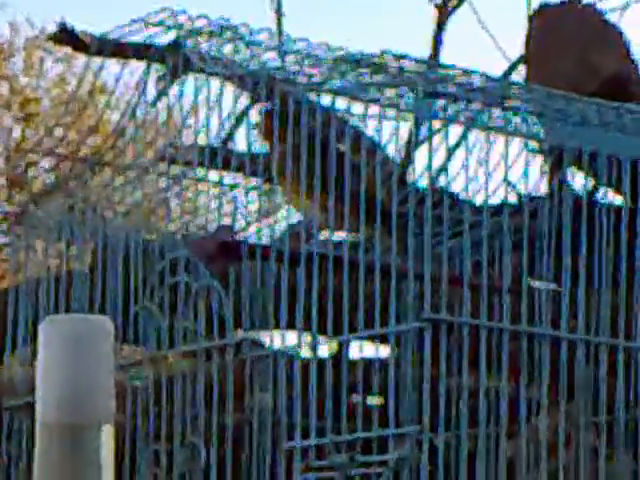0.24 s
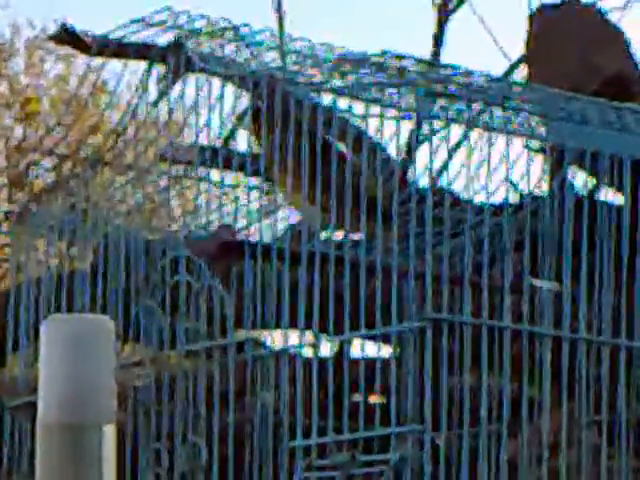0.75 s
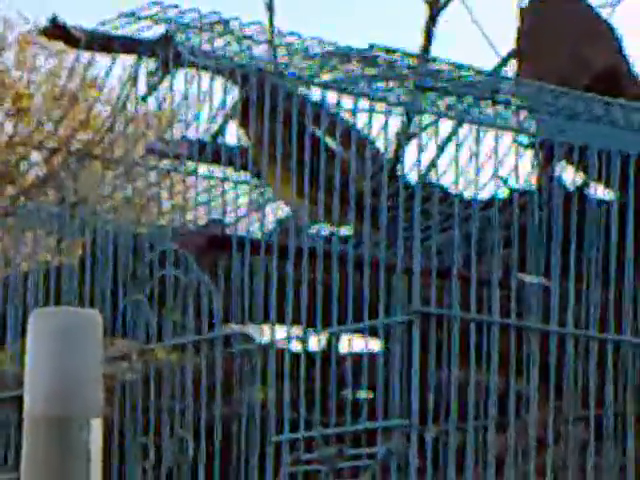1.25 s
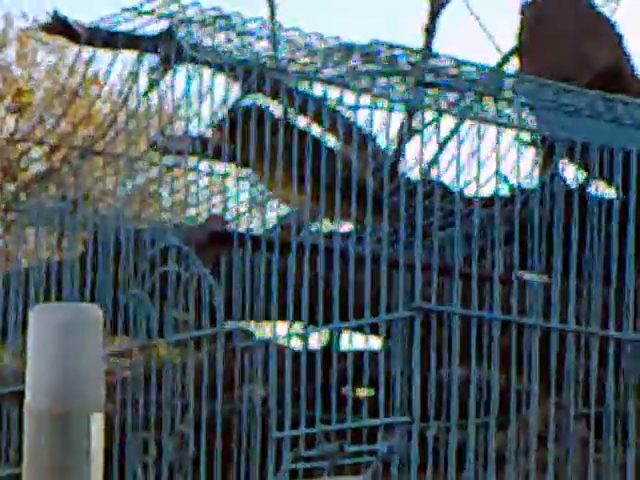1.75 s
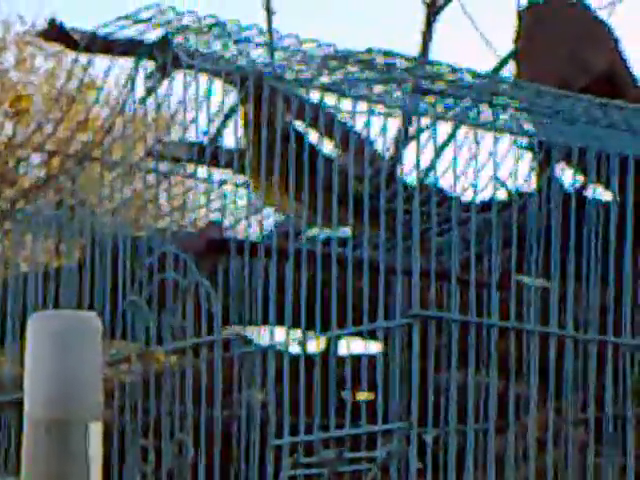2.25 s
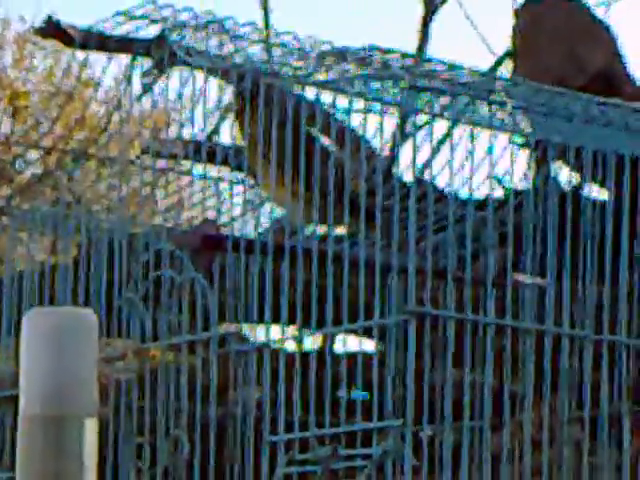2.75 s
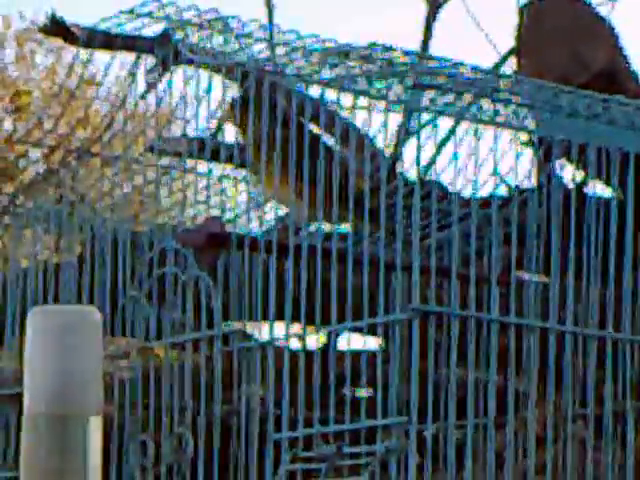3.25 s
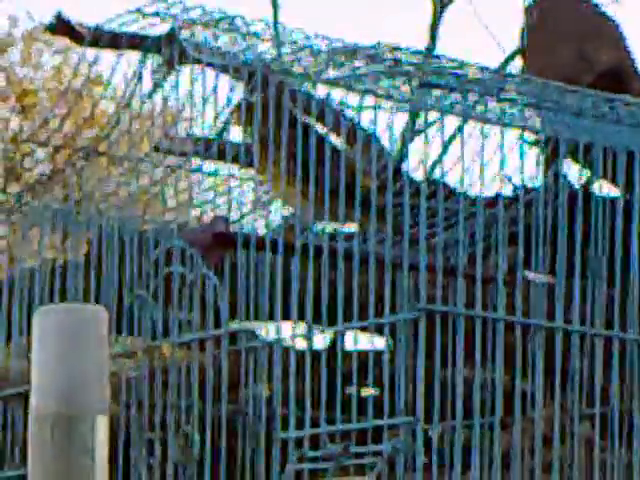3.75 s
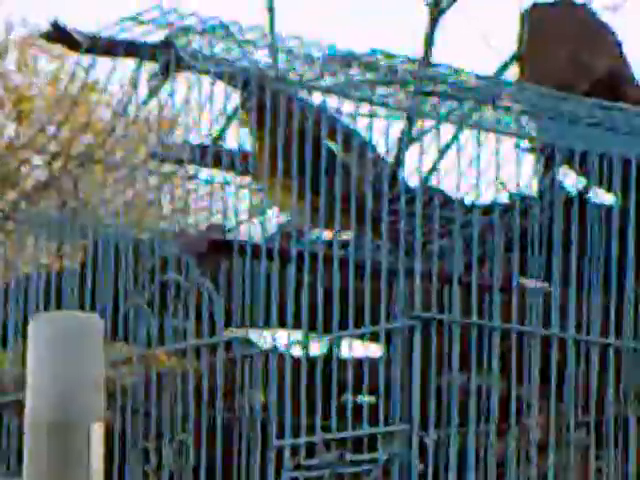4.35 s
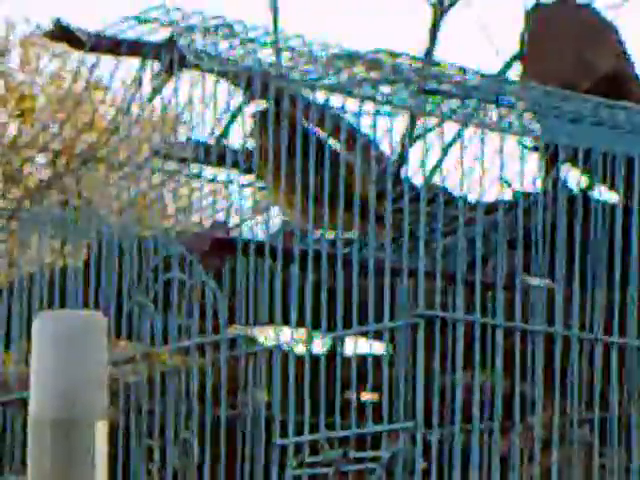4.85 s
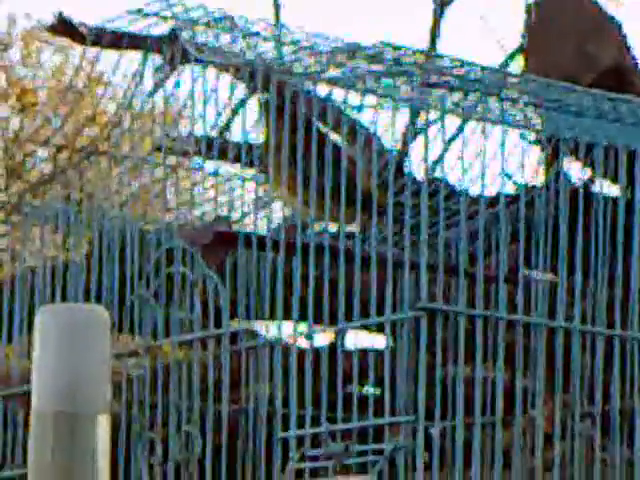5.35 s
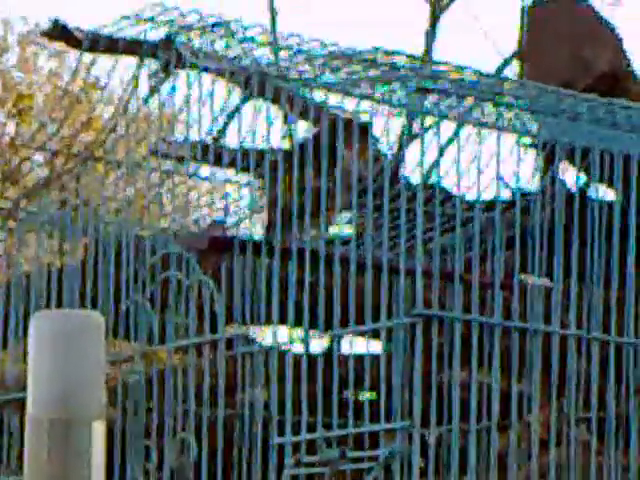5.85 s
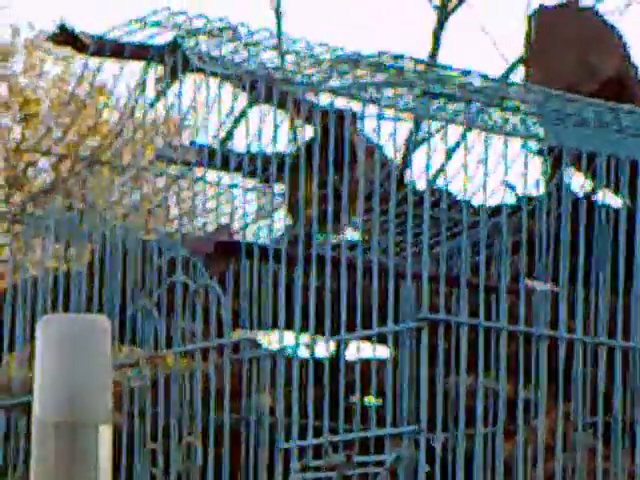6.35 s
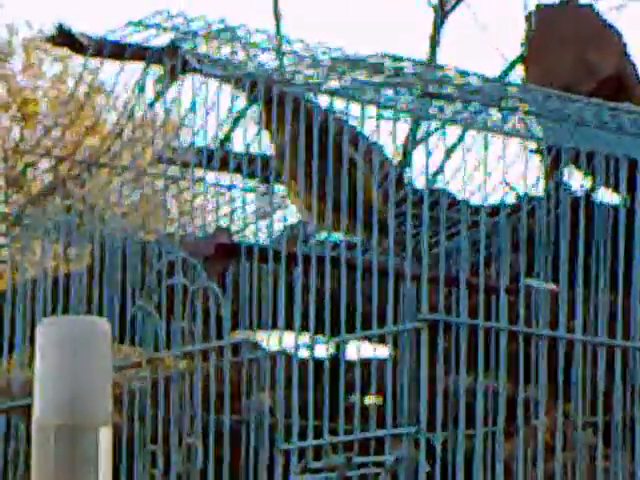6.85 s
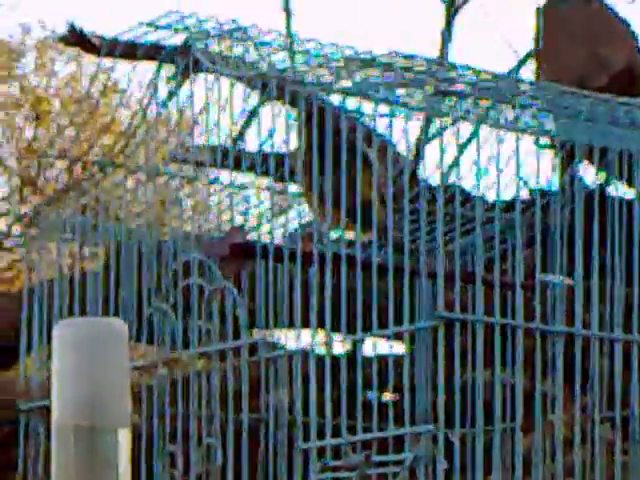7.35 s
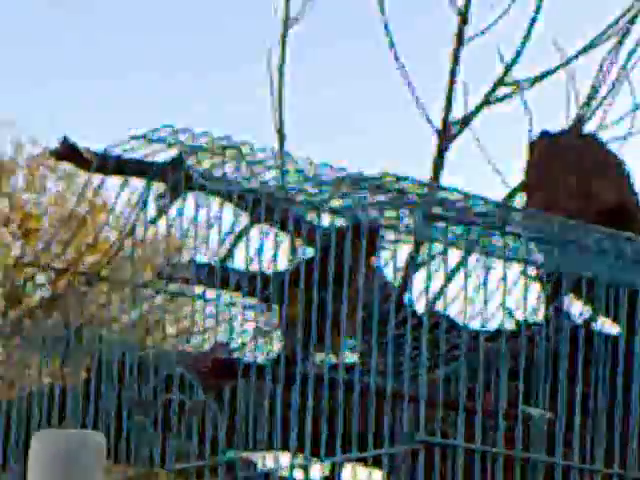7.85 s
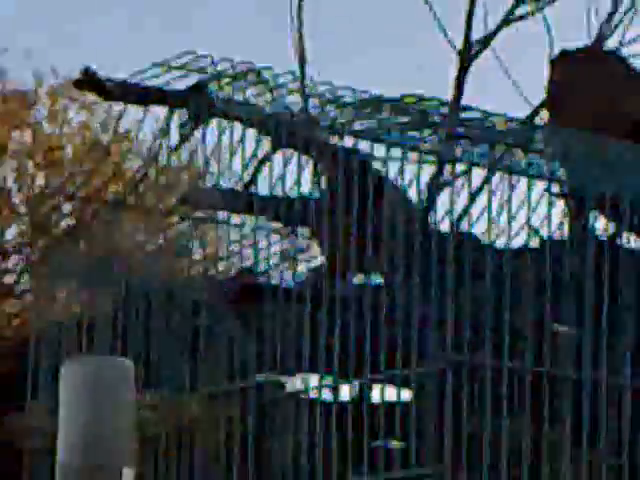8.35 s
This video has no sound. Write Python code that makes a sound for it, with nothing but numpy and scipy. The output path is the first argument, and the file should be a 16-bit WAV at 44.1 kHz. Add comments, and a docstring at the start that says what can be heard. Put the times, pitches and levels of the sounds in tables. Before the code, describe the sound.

Low gusty wind rumble and faint distant noise lie under a cage bird's clear, piercing song. Two short phrases come early with gaps where hoarse distant birds answer and light dry ticks are heard. Then the song thickens: a two-voiced upward note, lively chirps and twitters, a quick descending trill, and finally a string of rasping buzzes, with close short echoes from cage and wall.

```python
"""A caged canary hybrid sings outdoors, close to a hand-held microphone: slurred whistles, a two-voiced rising
note, chirps, twitters, a falling trill and a buzz. Each is a near-sine, shaped in pitch and level, roughened
by modulation. Cage and wall echo it; other birds sound further off, with a larger share of reflections.
Shaped noise makes the wind at the microphone, soft puffs, light ticks, a hiss on the notes,
and a far-off noise that swells and fades over still air."""
import sys
import numpy as np
from scipy import signal
from scipy.fft import rfft, irfft
from scipy.io import wavfile
from scipy.ndimage import uniform_filter1d

SR = 44100
rng = np.random.default_rng(int(sys.argv[2]) if len(sys.argv) > 2 else 0)


def store_pcm(level_fs):
    """Save levels as 16-bit WAV."""
    pcm = np.round(np.clip(level_fs, -1, 1) * 32767).astype(np.int16)
    wavfile.write(sys.argv[1], SR, np.atleast_2d(pcm).T)


N = 379701
TIME = np.arange(N) / SR


def whistle(start, hz, gain, second_db=-35):
    """Nearly sinusoidal oscillation: one side of the syrinx, with a faint octave and sidebands where it rasps."""
    phase = turn(hz)
    t = start + np.arange(len(hz)) / SR
    overtone = undb(second_db) * np.sin(2 * phase) * (hz < SR / 5)
    return fade(gain * (np.sin(phase) + overtone + rasp(phase, t)))


# Moments when the syrinx locks into a longer cycle.
# Each row: centre in seconds, half width in seconds, pitch cycles per long cycle, relative depth.
LONG_CYCLES = [(0.926, 0.015, 3.1, 0.49), (3.098, 0.01, 3.02, 0.56), (2.695, .03, 4.8, 0.36),
               (2.8, 0.025, 8.3, 0.15), (4.915, 0.022, 5, 0.35), (5.215, 0.039, 3.36, 0.39),
               (5.305, 0.005, 2.6, 0.69)]


def rasp(phase, t):
    """Subharmonic locking: a cycle several pitch periods long adds sidebands around the tone."""
    total = 0
    for centre, width, cycles, depth in LONG_CYCLES:
        if t[0] < centre < t[-1]:
            slow = phase / cycles
            sides = np.sin(phase + slow) + 0.26 * np.sin(phase - slow) + 0.24 * np.sin(phase + 2 * slow)
            locking = np.exp(-((t - centre) / width) ** 2)
            total = total + 0.56 * depth * locking * sides
    return total


def scratch(size, rough, flap_hz=680, jitter=0.17, grit=0.94):
    """Amplitude modulation: a membrane that flaps unevenly splits a whistle into parallel strands."""
    flap = np.cos(turn(np.full(size, float(flap_hz)), jitter))
    uneven = 1 + rough * (1.28 * flap + grit * walk(2200, size))
    return uneven / np.sqrt(1 + rough ** 2)


def turn(hz, waver=0.0078):
    """Phase as the integral of frequency: the pitch of the membrane wavers slightly."""
    return 2 * np.pi * np.cumsum(hz * (1 + waver * walk(500, len(hz)))) / SR


def fade(x, edge_s=0.00062):
    """Gradual onset and release: the airflow opens and shuts over a short linear ramp."""
    i = np.arange(len(x))
    return x * np.minimum(np.minimum(i, i[::-1]) / (edge_s * SR), 1)


# Level through a slide. Each row: time in fall times, level in dB relative to the slide.
SLIDE_SWELL = [(1.15, -0.5), (1.75, -0.5), (2.5, -10), (3.3, -26.5)]
# Slurred whistles. Each row: start in seconds, hold in seconds, fall time in seconds, bend of the fall (1-2),
# held pitch in Hz, final pitch in Hz, held note in dB, dip before the slide in dB, slide in dB.
SLURS = [(.835, .048, 0.045, 1.3, 5037, 3476, -21, -39.5, -21),
         (3.011, .044, .041, 1.45, 4990, 3522, -16.5, -33, -17.5),
         (6.445, 0.03, 0.026, 1.67, 6650, 4030, -54, -57, -17.5),
         (6.706, .023, 0.026, 1.85, 6560, 4010, -52, -60.5, -17.5)]


def slurs(edge_db=-26, held_peak=.44):
    """Stretched-exponential glide: a held note swells and dips, then swells again as pitch slides and settles."""
    out = np.zeros(N)
    for start, hold, fall, bend, high_hz, low_hz, held_db, dip_db, slide_db in SLURS:
        t = span(hold + fall * SLIDE_SWELL[-1][0])
        fallen = np.exp(-(np.maximum(t - hold, 0) / fall) ** bend)
        hz = low_hz + (high_hz - low_hz) * fallen
        held = [(0, held_db + edge_db), (held_peak * hold, held_db), (hold, dip_db)]
        slide = [(hold + fall * u, slide_db + swell_db) for u, swell_db in SLIDE_SWELL]
        db, = curve(held + slide, t)
        add(out, start, whistle(start, hz, undb(db)))
    return out


# The long rising note of the lower voice.
# Each row: time in seconds, pitch in Hz, fundamental in dB, second harmonic in dB.
LOWER_VOICE = [(5.008, 1581, -39, -30.5), (5.033, 1875, -31.5, -31.5), (5.045, 2120, -25.5, -5),
               (5.06, 2430, -28, -22.5), (5.068, 2633, -41, -10), (5.092, 2994, -33, -17),
               (5.12, 3120, -37, -24.5), (5.148, 3450, -30, -30.5), (5.2, 3644, -33, -27.5),
               (5.26, 3710, -46, -35.5), (5.3, 3634, -33.5, -63), (5.335, 3670, -39.5, -74)]
# Hoarseness of the rising note. Each row: time in seconds, roughness (0-1).
LOWER_ROUGHNESS = [(5.008, .3), (5.028, .2), (5.036, .03), (5.06, .04), (5.078, .15), (5.13, .25),
                   (5.2, .19), (5.26, .07), (5.335, .03)]


def lower_voice(third_db=-14, fourth_db=-32, throat_db=18):
    """Harmonic series of a hoarse, climbing note, mostly led by its second harmonic."""
    out, start = np.zeros(N), LOWER_VOICE[0][0]
    t = start + span(LOWER_VOICE[-1][0] - start)
    hz, first_db, second_db = curve(LOWER_VOICE, t)
    rough, = curve(LOWER_ROUGHNESS, t)
    phase = turn(hz, waver=0.0046)
    # while the pitch is low, the third harmonic lies in the throat resonance
    third = undb(third_db + np.interp(hz, [1700, 2400], [throat_db, 0]))
    odd = undb(first_db) * (np.sin(phase) + third * np.sin(3 * phase) + rasp(phase, t))
    even = undb(second_db) * (np.sin(2 * phase) + undb(fourth_db) * np.sin(4 * phase))
    hoarse = scratch(len(t), rough, flap_hz=918, jitter=0.33, grit=0.6)
    add(out, start, fade((odd + even) * hoarse))
    return out


# The upper voice of the two-voiced note. Each row: time in seconds, pitch in Hz, level in dB.
UPPER_VOICE = [(5.069, 5210, -14), (5.078, 5380, -29), (5.107, 6030, -18.5), (5.124, 5080, -26),
               (5.139, 5015, -18), (5.164, 5030, -31), (5.193, 4300, -27), (5.213, 4005, -15.5),
               (5.232, 3676, -26), (5.26, 3557, -21), (5.285, 3625, -32)]


def upper_voice():
    """Two independent oscillators: the other side whistles over the rising note and comes down to meet it."""
    out, start = np.zeros(N), UPPER_VOICE[0][0]
    hz, db = curve(UPPER_VOICE, start + span(UPPER_VOICE[-1][0] - start))
    add(out, start, whistle(start, hz, undb(db)))
    return out


# Short clear chirps. Each row: start in seconds, length in seconds, pitch at the start in Hz,
# at the middle in Hz, at the end in Hz, level in dB, place of the loudness peak (0-1).
CLEAR_CHIRPS = [(2.677, 0.047, 5530, 5217, 5450, -20, 0.26), (2.775, 0.044, 5500, 4860, 5420, -14.5, 0.37),
                (3.1553, 0.053, 3510, 3713, 3780, -29.5, 0.35), (4.901, 0.035, 5460, 5330, 4970, -24, .62),
                (5.4889, 0.019, 2630, 3830, 4780, -19.5, 0.57), (5.5598, .047, 2890, 4040, 4100, -16, 0.6),
                (5.6534, 0.07, 2500, 3213, 3620, -27, .54), (5.735, 0.031, 3280, 4910, 5020, -15, .26),
                (5.808, 0.048, 6130, 5974, 5930, -25.5, 0.63),
                (5.9082, 0.052, 5470, 5086, 5500, -16.5, 0.44),
                (5.9745, 0.055, 2620, 3285, 3560, -29.5, 0.47), (6.035, 0.042, 3100, 3993, 4030, -15, 0.7),
                (6.106, 0.034, 3640, 4850, 4470, -13.5, 0.31),
                (6.1454, .036, 5700, 5614, 5580, -19.5, 0.67), (6.28, .027, 3600, 4030, 4280, -18, 0.72),
                (6.4334, 0.032, 2760, 3766, 3500, -24.5, 0.3),
                (6.6823, 0.036, 2700, 3810, 3970, -22.5, 0.37)]


def clear_chirps(rough=0.041):
    """Frequency modulation of a clear tone: quick chirps with only slight roughness."""
    return chirps([(*row, rough) for row in CLEAR_CHIRPS])


def chirps(rows):
    """Parabolic frequency sweep: each chirp is one arc of pitch under one swell of air pressure."""
    out = np.zeros(N)
    for start, length, first_hz, middle_hz, last_hz, db, peak, rough in rows:
        u = span(length) / length
        arc = np.polyfit([0, .5, 1], [first_hz, middle_hz, last_hz], 2)
        hz = np.polyval(arc, u)
        progress = np.interp(u, [0, np.clip(peak, .05, .95), 1], [0, .5, 1])
        swell = np.sin(np.pi * progress) ** 2
        add(out, start, whistle(start, hz, undb(db) * swell * scratch(len(u), rough)))
    return out


# The four strokes of a twitter: rasping upstroke, low murmur, clear tone, rasping downstroke.
# Each row: start from the tone's start in seconds, length in seconds, pitch before the twitter's factor
# at the start in Hz, at the middle in Hz, at the end in Hz, place of the loudness peak (0-1), roughness.
TWITTER_STROKES = [(-.028, .017, 2840, 4150, 5600, 0.49, 1.2), (-.022, 0.0368, 2924, 3020, 3690, 0.64, 0.5),
                   (0, 0.0273, 4090, 4450, 4700, .35, 0.03), (.019, .026, 4700, 3960, 1970, 0.49, 0.6)]
# Each row: start of the clear tone in seconds, pitch factor, then upstroke, murmur, tone and downstroke in dB.
TWITTERS = [(.761, .96, -33.5, -42.5, -20, -34.5), (2.931, 1, -27, -37, -17, -27.5),
            (6.257, 1.08, -44, -40, -27.5, -48), (6.381, 1.05, -36.5, -43.5, -21, -30),
            (6.632, 1.005, -32.5, -44.5, -24, -30.5)]


def twitters():
    """Transposition of one motif: the same four strokes, a little higher or lower and differently stressed."""
    rows = []
    for start, pitch, *levels in TWITTERS:
        for stroke, db in zip(TWITTER_STROKES, levels):
            delay, length, first, middle, last, peak, rough = stroke
            rows.append((start + delay, length, first * pitch, middle * pitch, last * pitch, db, peak, rough))
    return chirps(rows)


# One falling syllable, before stretch and pitch factor.
# Each row: time from its start in seconds, pitch in Hz, relative level in dB.
FALLING_SYLLABLE = [(0.0, 8360, -39), (0.0044, 6660, -37), (0.0061, 5260, -16), (0.0093, 4960, -8),
                    (0.0139, 4550, -34), (0.0171, 4044, -14.5), (0.025, 3430, -22), (0.034, 3090, -26.5),
                    (0.043, 2677, -38.5)]
# The trill. Each row: start in seconds, stretch in time, pitch factor, relative level in dB.
TRILL = [(6.8929, 1.42, 0.96, -7), (6.968, 1.16, 0.95, -0.7), (7.0375, 1.05, 0.97, 1.5),
         (7.1085, 1.07, 0.98, 0.4), (7.1748, 1.03, 0.98, 1.5), (7.2423, 1.08, 0.95, -1.2),
         (7.3127, 1.04, 0.97, -1), (7.3836, 1.06, 0.97, -2.5)]


def trill():
    """Periodic repetition of one steep downward sweep, about fourteen times a second."""
    out = np.zeros(N)
    for start, stretch, pitch, db in TRILL:
        t = span(FALLING_SYLLABLE[-1][0] * stretch) / stretch
        hz, shape_db = curve(FALLING_SYLLABLE, t)
        add(out, start, whistle(start, hz * pitch, undb(db + shape_db)))
    return out


# One cycle of the buzz, a whip up and down. Each row: share of the cycle, pitch in Hz, relative level in dB.
WHIP = [(0, 2634, -32), (.12, 4370, 0.5), (.2, 5507, -7), (.32, 7210, -6), (.42, 7490, -10.5),
        (.52, 5210, -6.5), (.62, 3900, -10), (.75, 2897, -29.5), (1, 4496, -5)]
# Buzzy syllables. Each row: start in seconds, relative level in dB, length in seconds.
BUZZ = [(7.482, -19.5, 0.05), (7.5718, -16.5, 0.049), (7.662, -16, 0.055), (7.755, -16, 0.054),
        (7.8482, -13, 0.055), (7.946, -13.5, 0.052), (8.041, -13.5, 0.056)]
# Colour of the rasping air. Each row: frequency in Hz, relative level in dB.
BUZZ_AIR = [(1500, -29.5), (2600, -20), (3500, -22), (4700, 5.5), (5700, -13), (6300, -25), (7200, -14),
            (8600, -21), (10000, -22.5), (12500, -17.5), (16000, -34)]


def buzz(whip_s=.0135, rough=0.061, first_db=-10, flutter_db=2, air_db=-9, high_hz=8000):
    """Fast periodic frequency modulation: about four pitch whips a swelling syllable, each with rasping air."""
    out = np.zeros(N)
    for start, db, length in BUZZ:
        t = span(length)
        hz, shape_db = curve(WHIP, t / whip_s % 1)
        push_db = np.interp(t / length, [0, .55, 1], [first_db, 0, -1]) + flutter_db * walk(900, len(t))
        gain = undb(db + shape_db + push_db)
        tone = whistle(start, hz * (1 + rough * walk(1500, len(t))), gain)
        air = undb(air_db) * fade(gain * noise(BUZZ_AIR, len(t)))
        add(out, start, dull(tone, high_hz, order=4) + air)
    return out


# Echoes from cage, ledge and wall. Each row: delay in seconds, level in dB relative to the direct sound.
ECHOES = [(.002, -24), (.0044, -10), (.0069, -14), (.009, -35), (.0095, -17), (0.0114, -16)]


def yard(x, scatter_db=-12, scatter_t60=0.089, far_db=-24, far_t60=0.41):
    """Reflection: direct sound, close echoes, scatter from the cage and a faint, duller outdoor tail."""
    echoes = sum(undb(db) * np.roll(x, int(delay * SR)) for delay, db in ECHOES)
    scatter = tail(x, t60=scatter_t60, db=scatter_db)
    far = tail(dull(x, 4000, order=6), t60=far_t60, db=far_db)
    return x + echoes + scatter + far


def tail(x, t60, db, gap_s=0.002):
    """Exponential decay of scattered reflections, which fall 60 dB in t60 seconds."""
    t = span(.6)
    response = rng.standard_normal(len(t)) * undb(-60 * t / t60) * (t > gap_s)
    return undb(db) * signal.fftconvolve(x, response / np.linalg.norm(response))[:N]


# Colour of the hiss. Each row: frequency in Hz, relative level in dB.
HISS_COLOUR = [(1000, -16.5), (3000, 6), (5000, -2.5), (6500, -4.5), (9000, 0.5), (13000, 2), (16000, 1)]
# Hiss phrase by phrase. Each row: time in seconds, relative level in dB.
HISS_LEVEL = [(1, -0.5), (2.65, 7.5), (3.2, 2.5), (4.9, 8), (5.2, 2), (5.9, 0.5), (6.7, -1.5), (8.1, 0)]


def hiss(song, db=-34, law=0.37, quiet_db=-40):
    """Envelope following: a faint wide hiss rides on the notes, compressed in level, and sinks between them."""
    loudness = np.sqrt(np.abs(uniform_filter1d(song ** 2, size=500)))
    sounding = loudness ** 2 / (loudness ** 2 + undb(quiet_db) ** 2)
    loudest = loudness.max()
    compressed = loudest * (loudness / loudest) ** law
    phrase_db, = curve(HISS_LEVEL, TIME)
    return undb(db + phrase_db) * compressed * sounding * noise(HISS_COLOUR)


# Other birds. Each row: start in seconds, length in seconds, pitch at the start in Hz, at the end in Hz,
# relative level in dB, roughness (0-1).
FAR_CHIRPS = [(.152, .04, 3310, 5000, -41, 0.9), (0.175, 0.045, 4210, 2610, -35.5, 0.5),
              (0.5, 0.082, 4340, 3100, -52.5, .6), (1.114, 0.061, 3800, 4890, -44.5, 0.7),
              (1.146, 0.032, 4030, 2640, -40.5, 0.7), (1.336, .027, 3520, 4990, -42, 0.8),
              (1.359, 0.046, 4010, 2650, -38, .35), (1.435, 0.035, 4700, 3500, -54, 0.7),
              (1.545, 0.04, 4360, 4140, -53, 0.1), (1.729, 0.06, 5020, 3800, -51.5, 0.4),
              (2.073, 0.062, 4060, 2540, -50, 0.4), (3.26, 0.037, 5220, 4170, -48, 0.3),
              (3.322, .05, 4700, 2630, -40, 0.2), (3.351, 0.073, 3030, 2510, -43, .1),
              (3.395, 0.058, 5300, 2960, -47.5, 0.2), (3.645, 0.068, 3990, 3300, -52.5, 0.5),
              (4.413, 0.079, 4366, 4720, -41.5, 0.4), (4.738, 0.095, 4340, 3200, -54, .4),
              (4.939, 0.046, 4230, 2970, -37.5, 0.65)]


def other_birds(direct_db=-3, sag=0.96, peak=.33):
    """Low direct-to-reverberant ratio: slides from further off, some hoarse, with a large share of reflections."""
    rows = []
    for start, length, first, last, db, rough in FAR_CHIRPS:
        middle = sag * (first + last) / 2
        rows.append((start, length, first, middle, last, db, peak, rough))
    far = chirps(rows)
    return undb(direct_db) * far + tail(far, t60=0.22, db=-5.0)


# Light ticks. Each row: time in seconds, relative level in dB.
TICKS = [(1.226, -32), (1.306, -41), (1.918, -31), (2.249, -39), (2.71, -28.5), (3.517, -37), (3.931, -36),
         (4.068, -26), (4.117, -37), (4.195, -29.5), (4.353, -30), (4.405, -28.5), (4.434, -29),
         (6.992, -30), (7.14, -31), (8.162, -27.5), (8.41, -28.5)]
# What the ticks ring with. Each row: frequency in Hz, relative level in dB.
TICK_COLOUR = [(300, -3.5), (900, 4.5), (1800, 4.5), (2700, -9), (4300, 2), (7000, -11), (15000, -20)]


def ticks(t60=0.051, gain_db=-7):
    """Damped impact: small dry knocks on the cage, noise that decays exponentially."""
    out, t = np.zeros(N), span(0.087)
    for start, db in TICKS:
        add(out, start, noise(TICK_COLOUR, len(t)) * undb(db + gain_db - 60 * t / t60))
    return out


# Soft hollow puffs. Each row: start in seconds, length in seconds, centre in Hz, relative level in dB.
PUFFS = [(0.203, 0.21, 1250, -42.5), (0.198, 0.17, 780, -47), (0.682, 0.17, 1090, -40),
         (1.851, 0.32, 965, -49), (3.803, 0.2, 1070, -44), (4.003, 0.15, 1000, -43),
         (6.091, 0.13, 1055, -51)]
# Resonance of a puff. Each row: ratio to the centre frequency, relative level in dB.
PUFF_SHAPE = [(.5, -18), (.8, -2.5), (1, 7.5), (1.15, -12.5), (1.4, -8.5), (2, -44)]


def puffs():
    """Resonance-filtered noise: short distant bursts in one broad band, quick to rise and slower to die."""
    out = np.zeros(N)
    for start, length, hz, db in PUFFS:
        u = span(length) / length
        body = noise([(hz * ratio, shape_db) for ratio, shape_db in PUFF_SHAPE], len(u))
        add(out, start, body * undb(db) * np.sin(np.pi * u ** 0.64) ** 2)
    return out


# Colours of the low and upper wind. Each row: frequency in Hz, relative level in dB.
WIND_LOW = [(15, 0), (30, 7), (60, 10.5), (85, 10.5), (115, 4.5), (160, -6), (250, -62)]
WIND_HIGH = [(70, -34.5), (125, 2), (170, -1.5), (240, -11), (330, -21.5), (480, -34.5), (900, -75)]
# Strength of the breeze at the microphone. Each row: time in seconds, relative level in dB.
BREEZE = [(0, -40), (.12, -27.5), (.85, -31.5), (1.84, -35.5), (1.97, -46), (2.72, -48.5), (2.9, -36),
          (3.25, -42.5), (3.6, -32), (4.28, -35.5), (4.85, -30), (5.08, -49), (5.38, -31), (6.2, -37),
          (6.55, -21.5), (7.0, -39.5), (7.85, -28), (8.15, -41.5), (8.35, -29.5), (8.61, -35)]
# Gusts. Each row: centre in seconds, length in seconds, rumble and upper part as relative levels in dB.
GUSTS = [(0.127, 0.19, -22, -37.5), (0.286, 0.14, -21.5, -24.5), (0.538, 0.059, -27, -46),
         (0.632, 0.098, -19, -32.5), (0.742, 0.092, -24, -35), (1.071, 0.22, -26, -28.5),
         (1.181, 0.076, -28, -27), (1.55, 0.19, -25, -35), (2.137, .05, -31.5, -49),
         (2.46, 0.092, -38, -56), (3.347, 0.12, -35, -41), (3.653, .12, -27, -48),
         (3.935, 0.13, -23.5, -33.5), (4.4, 0.15, -28, -38), (4.482, 0.095, -26, -29.5),
         (5.532, 0.27, -25, -38), (5.838, 0.042, -20.5, -42), (5.985, 0.15, -26, -34.5),
         (6.104, 0.19, -25.5, -40.5), (6.363, 0.26, -37, -36), (6.6, 0.39, -35, -30),
         (6.797, 0.21, -30, -25.5), (7.086, 0.14, -29, -29.5), (7.43, 0.064, -25, -29.5),
         (7.517, 0.08, -20, -24.5), (7.663, 0.12, -20, -26), (7.909, 0.17, -46, -28)]


def wind(low_gain_db=-1, high_gain_db=-2, flutter_db=3.0, upper_db=-14.0, upper_law=1.4,
         usual_db=-35, sway_hz=42, sway_law=0.48):
    """Turbulent pressure: eddies buffet the microphone in breeze and gusts; deep sway lasts through lulls."""
    breeze_db, = curve(BREEZE, TIME)
    low = undb(breeze_db)
    # stronger air reaches higher
    high = undb(usual_db + upper_db + upper_law * (breeze_db - usual_db))
    for centre, length, rumble_db, top_db in GUSTS:
        gust = np.cos(np.pi * np.clip((TIME - centre) / length, -.5, .5)) ** 2
        low = np.hypot(low, undb(rumble_db) * gust)
        high = np.hypot(high, undb(top_db) * gust)
    eddies_db = flutter_db * walk(35)
    sway_level = undb(usual_db) * (low / undb(usual_db)) ** sway_law
    sway = dull(noise(WIND_LOW), sway_hz, order=3) * sway_level
    above_sway = signal.butter(3, sway_hz, "high", fs=SR, output="sos")
    rumble = signal.sosfilt(above_sway, noise(WIND_LOW)) * low * undb(low_gain_db + 0.52 * eddies_db)
    upper = noise(WIND_HIGH) * high * undb(high_gain_db + eddies_db)
    return sway + rumble + upper


# Colours of the rush, the hollow ring and the still air. Each row: frequency in Hz, relative level in dB.
SWELL_COLOUR = [(300, -7), (520, -4), (750, 0.5), (1050, 0), (1600, 2), (2100, -2.5), (2700, -11),
                (4500, -10.5), (6500, -26.5), (15000, -30)]
RING_COLOUR = [(400, -27), (560, -8.5), (603, 1.5), (650, -10), (900, -45)]
AIR_COLOUR = [(120, -18), (200, 2), (456, -6), (579, -7), (933, -13), (1100, -7.5), (1210, -18.5),
              (1590, -18.5), (2170, -21), (4430, -21), (5730, -28), (15100, -23), (16000, -33.5)]
# Swells. Each row: start in seconds, rush and hollow ring as relative levels in dB.
SWELLS = [(.21, -56, -58), (1.269, -47, -59), (1.42, -47.5, -48), (1.86, -47, -49), (2.681, -42.5, -57.5),
          (2.849, -45, -66), (2.96, -45.5, -55), (3.48, -52, -53.5), (3.778, -46.5, -46),
          (4.029, -39.5, -39), (4.15, -55, -53), (4.37, -51, -51.5), (5.32, -58, -58.5), (6.11, -58, -56.5),
          (6.95, -51, -75), (7.1, -53, -72), (7.68, -64, -57), (7.95, -45, -50), (8.049, -46, -44.5),
          (8.39, -48.5, -54), (8.57, -45, -64)]
# The murmur beneath the swells. Each row: time in seconds, relative level in dB.
MURMUR = [(0, -61.5), (1, -65), (1.6, -61.5), (2.5, -61.5), (4.5, -59.5), (6.5, -59), (8.61, -58.5)]


def distance(swell_gain_db=1, ring_gain_db=-1, air_db=-56.5, flicker_db=3.0, rush_fall=77, ring_fall=43.5):
    """Power addition of decaying swells: far-off noise flickers and fades (dB per second) over still air,
    joined by a hollow ring near 600 Hz."""
    murmur_db, = curve(MURMUR, TIME)
    rush_power = sum((undb(db) * surge(start, rush_fall)) ** 2 for start, db, _ in SWELLS)
    ring_power = sum((undb(db) * surge(start, ring_fall)) ** 2 for start, _, db in SWELLS)
    swell = np.sqrt(undb(murmur_db) ** 2 + rush_power)
    rush = noise(SWELL_COLOUR)
    low, below = dull(rush, 700, order=1), dull(rush, 1200, order=1)
    # three bands flicker independently
    patchy = sum(part * undb(flicker_db * walk(35)) for part in (low, below - low, rush - below))
    ring = noise(RING_COLOUR) * np.sqrt(ring_power) * undb(ring_gain_db)
    return patchy * swell * undb(swell_gain_db) + ring + noise(AIR_COLOUR) * undb(air_db)


def surge(start, fall_db_per_s, attack_s=0.032):
    """Attack and exponential decay: an envelope that rises quickly, then dies away."""
    t = TIME - start
    return np.clip(t / attack_s, 0, 1) * undb(-fall_db_per_s * np.maximum(t - attack_s, 0))


def noise(colour, size=N):
    """Spectral shaping: noise of rms 1 filtered through points in Hz and dB on a log-frequency axis."""
    hz, db = np.transpose(colour)
    f = np.maximum(np.fft.rfftfreq(size, 1 / SR), 1)
    shape = undb(np.interp(np.log(f), np.log(hz), db))
    x = irfft(rfft(rng.standard_normal(size)) * shape, size)
    return x / x.std()


def walk(rate, size=N):
    """Slow random modulation: levels held 1 / rate seconds and smoothed twice; spread near 1."""
    k = max(int(SR / rate), 1)
    held = np.repeat(rng.standard_normal(size // k + 1), k)
    return np.sqrt(2) * uniform_filter1d(uniform_filter1d(held, k), k)[:size]


def dull(x, hz, order=2):
    """Low-pass filtering: a Butterworth slope removes the treble."""
    return signal.sosfilt(signal.butter(order, min(hz, .45 * SR), fs=SR, output="sos"), x)


def undb(db):
    """Logarithmic level: decibels to amplitude gain."""
    return 10 ** (np.asarray(db) / 20)


def curve(rows, t):
    """Linear interpolation: the columns of a table joined by straight lines over its first column."""
    s, *columns = np.transpose(rows)
    return [np.interp(t, s, c) for c in columns]


def span(length):
    """Uniform sampling: the sample times of a sound, in seconds."""
    return np.arange(int(length * SR)) / SR


def add(out, start, x):
    """Superposition: mix a sound in at a time in seconds."""
    i = int(start * SR)
    out[i:i + len(x)] += x[:N - i]


def scene():
    """Superposition of sources: the singer in front, everything else around it."""
    voices = slurs() + lower_voice() + upper_voice() + clear_chirps() + twitters() + trill() + buzz()
    song = yard(voices)
    return (song + hiss(song) + other_birds() + ticks() + puffs() + wind() + distance())[None]


def record(dry, top_hz=16200):
    """Band limiting: the recorder cuts the top with a steep elliptic low-pass."""
    return signal.sosfilt(signal.ellip(10, .2, 70, top_hz, fs=SR, output="sos"), dry)


dry = scene()
out = record(dry)
store_pcm(out)
```